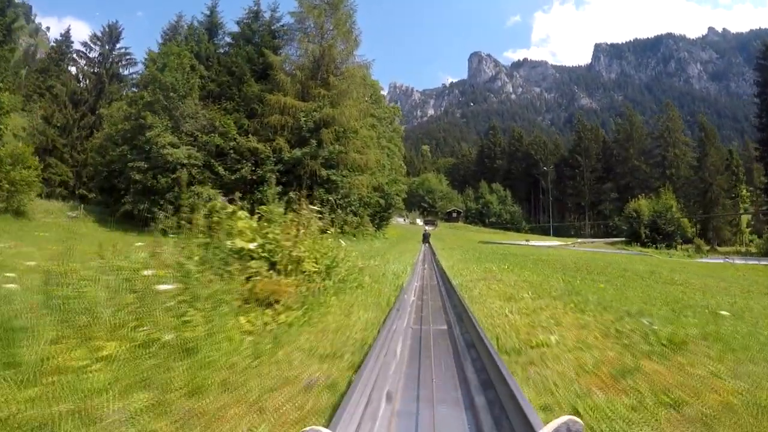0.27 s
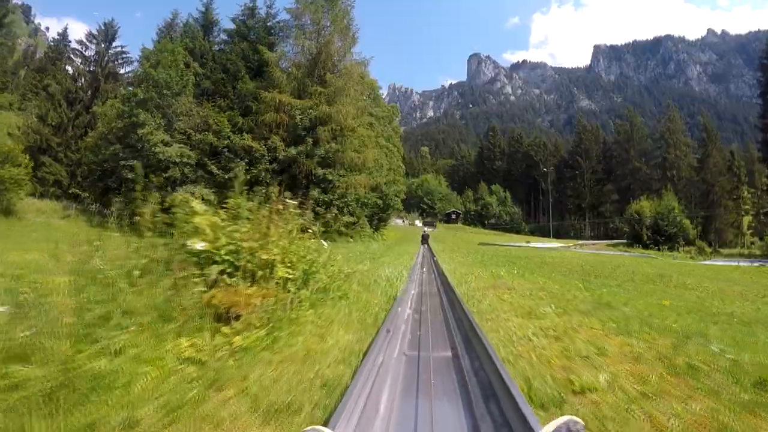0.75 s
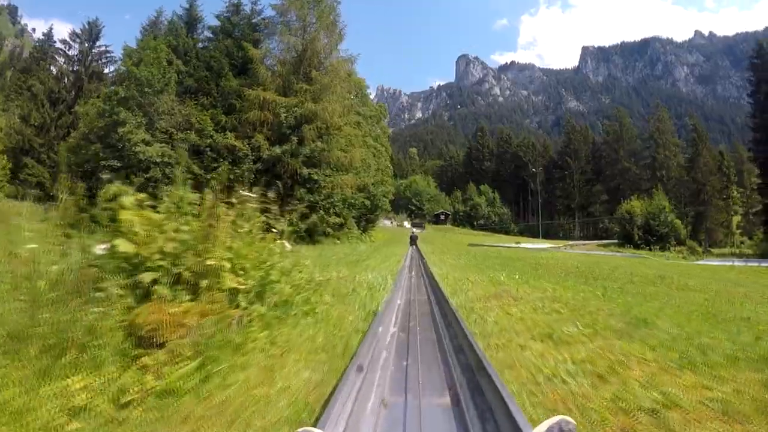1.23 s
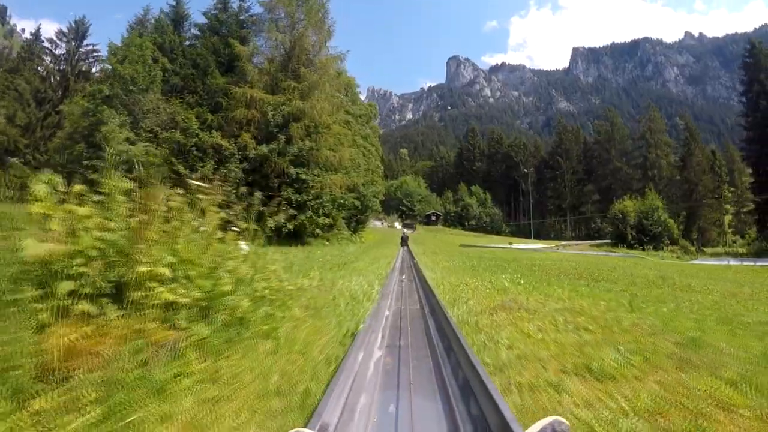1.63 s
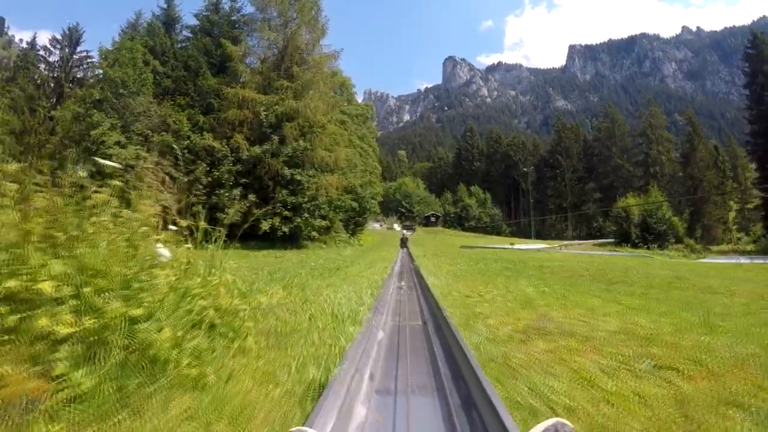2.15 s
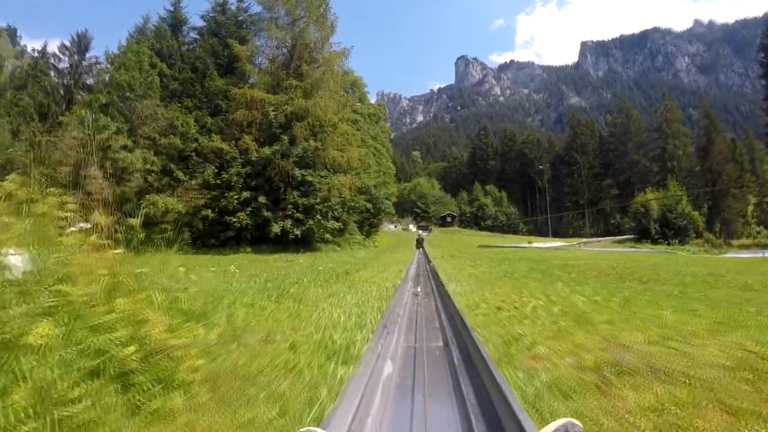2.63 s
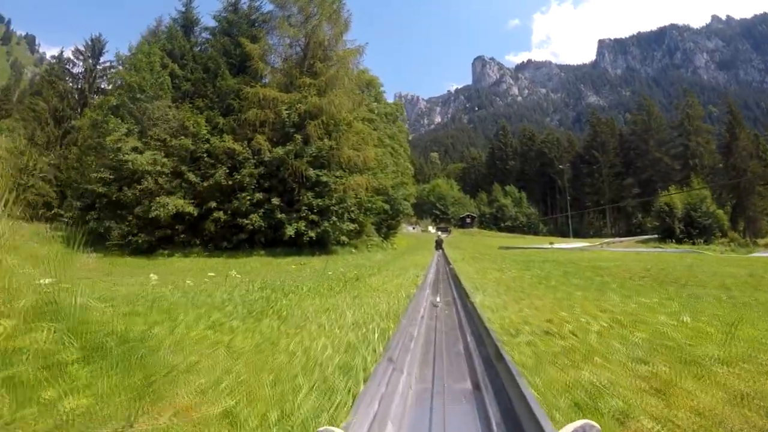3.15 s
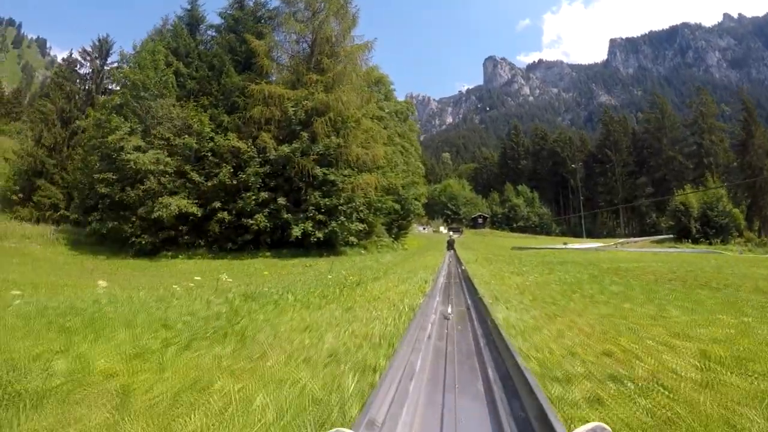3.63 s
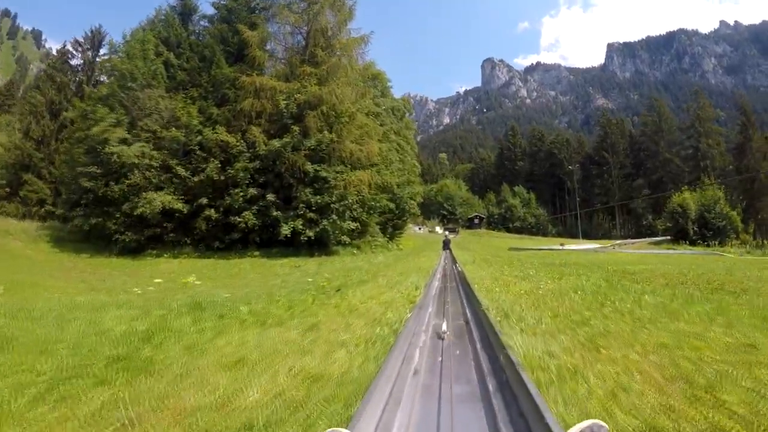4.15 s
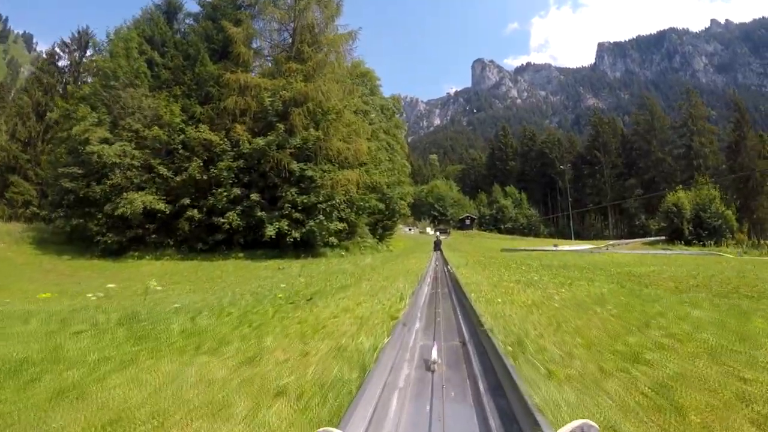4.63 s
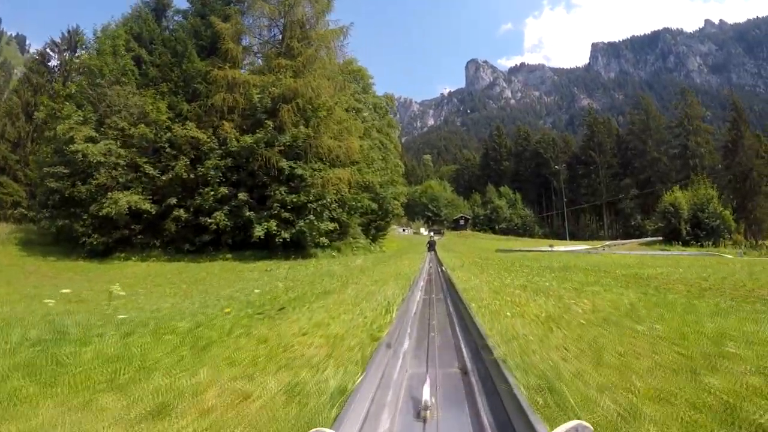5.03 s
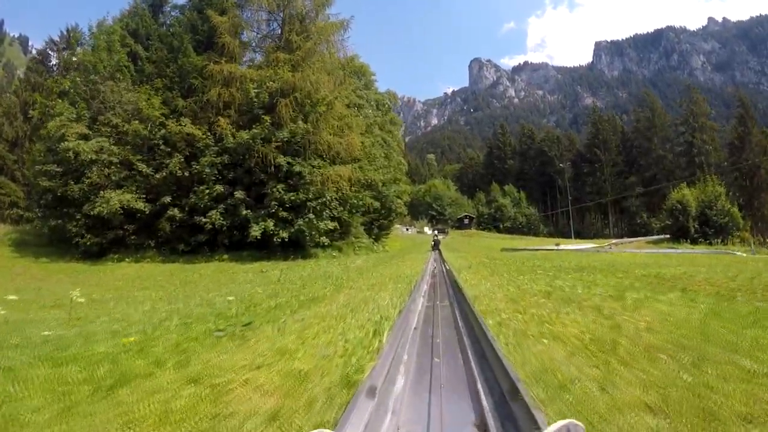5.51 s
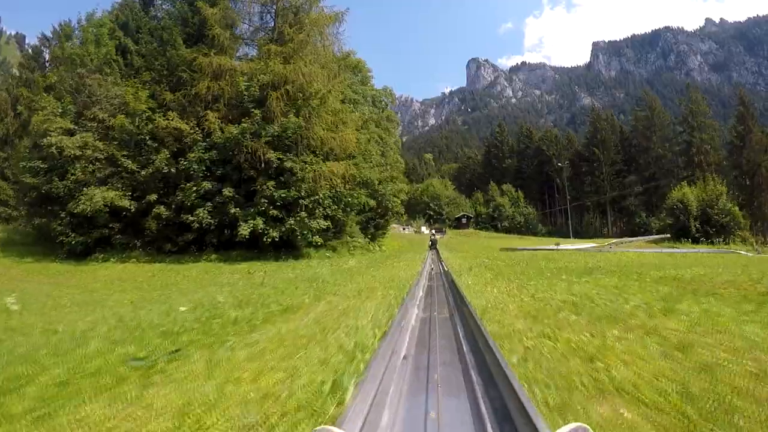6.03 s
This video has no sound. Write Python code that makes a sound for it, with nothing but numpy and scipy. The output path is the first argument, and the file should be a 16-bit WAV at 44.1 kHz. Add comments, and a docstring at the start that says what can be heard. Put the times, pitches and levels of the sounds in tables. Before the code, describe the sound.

A summer toboggan rolls down a metal trough, heard from the sled. Throughout the six seconds or so, the chassis rumbles low, the trough drones and the wheels growl with a light hiss and ticks of grit. Heavy rattling jolts come right at the start, around 0.4 to 0.7 seconds and at 1.4 seconds, with lighter knocks of loose parts between and after. A faint, high cricket buzz rises from about 0.2 seconds and stops abruptly at 1.2. From 2.4 seconds the runners give occasional tiny, faint squeaks. The sound starts in mono and opens into very wide stereo between 3.5 and 4 seconds, followed by a cluster of short pitched clicks. The rolling then eases a little. Soft hollow wheel taps come from 4.6 seconds to the end, and at 5.8 seconds the wheels strike a joint with a short metallic clack.

```python
"""Summer toboggan in a metal trough.

Heard from the sled: the rough track shakes the chassis and drums on the trough; the wheels growl,
roar and hiss. Loose parts knock amid pitched clicks, grit ticks, the runners catch and squeak. Early
on a bush cricket buzzes in the meadow, file on scraper; late, the wheels tap and strike a joint.
Mono at first, opening into very wide stereo after 3.5 s."""
import sys
import numpy as np
from scipy import signal
from scipy.fft import rfft, irfft
from scipy.io import wavfile
from scipy.ndimage import uniform_filter1d

SR = 44100
rng = np.random.default_rng(int(sys.argv[2]) if len(sys.argv) > 2 else 0)


def transcribe(u):
    """Save the signal u as a 16-bit wav file named by the first command-line argument.

    u: samples, shape (n,) or (channels, n), limited to [-1, 1]; the rate is SR.
    q: integer samples, one column per channel.
    """
    v = np.clip(np.atleast_2d(u).T, -1, 1)
    q = np.round(v * 32767).astype(np.int16)
    wavfile.write(sys.argv[1], SR, q)


N = 276507
TIME_S, HZ = np.arange(N) / SR, np.fft.rfftfreq(N, 1 / SR)
BLOW_S, BLOW_HZ = np.arange(8192) / SR, np.fft.rfftfreq(8192, 1 / SR)

# Shaking of the sled. Each row: time in seconds, chassis rumble in dB, trough drone in dB.
SHAKE = [(0.0, -6.5, -21.5), (0.05, -20, -20.5), (0.14, -3.5, -23.5), (0.21, -20.5, -26.5),
         (0.71, -18.5, -17.5), (0.77, -21.5, -25), (1.33, -14.5, -22.5), (1.4, -30, -20),
         (1.55, -14, -23.5), (1.82, -22, -28.5), (1.9, -13, -22.5), (2.0, -16.5, -16.5), (2.2, -16.5, -18),
         (2.4, -13.5, -21.5), (2.66, -20, -17.5), (2.88, -17, -21.5), (3.2, -17.5, -21), (3.33, -15, -18.5),
         (3.7, -18.5, -22.5), (3.75, -27.5, -24.5), (5.71, -23.5, -29), (6.22, -24.5, -25),
         (6.27, -21.5, -35.5)]
# Rolling contact. Each row: time in seconds, track roughness in dB, hiss in dB.
ROLL = [(0.0, -33.5, -49.5), (0.19, -44, -57.5), (0.44, -43.5, -57.5), (0.56, -36, -55), (0.91, -44, -58.5),
        (1.48, -40.5, -54.5), (1.8, -42, -58), (2.16, -39, -53.5), (2.47, -44, -56), (2.58, -40.5, -54),
        (2.79, -41, -53.5), (4.12, -40.5, -58), (4.4, -46.5, -60.5), (5.9, -50, -63.5),
        (6.27, -47.5, -64.5)]


def gain_of(db):
    """Decibels to amplitude."""
    return 10 ** (np.asarray(db) / 20)


def unit_rms(x):
    """Scale to rms 1."""
    return x / np.sqrt(np.mean(x ** 2) + 1e-20)


def curves(rows):
    """Each later column, interpolated over the times in the first."""
    times_s, *columns = np.transpose(rows)
    return [np.interp(TIME_S, times_s, column) for column in columns]


def spectrum(points, hz=HZ):
    """Gain through (Hz, dB) points on a log-frequency axis; steep fall past the last."""
    point_hz, point_db = np.transpose(points)
    db = np.interp(np.log(hz + 1), np.log(point_hz + 1), point_db)
    return gain_of(db) / np.maximum(hz / point_hz[-1], 1) ** 5


def ringing(modes, hz=HZ):
    """Gain of resonances given as (centre Hz, width Hz, dB)."""
    return np.sqrt(sum(gain_of(db) ** 2 / (1 + (2 * (hz - f) / width) ** 2) for f, width, db in modes))


def colour(x, gain):
    """Filter a whole signal, then scale to rms 1."""
    return unit_rms(irfft(rfft(x) * gain, N))


def noise(n=N):
    """White noise."""
    return rng.standard_normal(n)


def wander(rate_hz):
    """Slow random curve, rms 1."""
    return colour(noise(), np.exp(-(HZ / rate_hz) ** 2))


def causal(gain):
    """Minimum-phase impulse response: sharp start, then ringing."""
    cepstrum = irfft(np.log(np.maximum(gain, 1e-5)))
    half = len(cepstrum) // 2
    cepstrum[1:half] *= 2
    cepstrum[half + 1:] = 0
    return irfft(np.exp(rfft(cepstrum)))


def resonate(x, hz, width_hz):
    """Resonator that follows the curve hz."""
    turn = np.exp(2j * np.pi * np.cumsum(hz) / SR)
    pole = np.exp(-np.pi * width_hz / SR)
    return 2 * (turn * signal.lfilter([1 - pole], [1, -pole], x / turn + 1e-18)).real


def add(mix, start_s, sound):
    """Mix a sound in at start_s."""
    part = mix[max(round(start_s * SR), 0):][:len(sound)]
    part += sound[:len(part)]


def steadied(x, span_s):
    """Hold the running rms near 1."""
    return x / np.sqrt(uniform_filter1d(x ** 2, int(span_s * SR)) + 1e-6)


def patchy(x, depth_db):
    """Narrow bands flare and fade briefly, each on its own."""
    bands = signal.stft(x, nperseg=512)[2]
    patches = uniform_filter1d(noise(bands.shape), size=5, axis=0)
    patches = unit_rms(uniform_filter1d(patches, size=3, axis=1))
    return unit_rms(signal.istft(bands * gain_of(depth_db * patches), nperseg=512)[1][:N])


def frame_gain(hz, ring):
    """The sled frame's resonances on top of a flat response."""
    # Each row: centre in Hz, width in Hz, gain in dB.
    frame_modes = [(1430, 120, -13.5), (1850, 19, -0.5), (2077, 140, -4.5), (2080, 22, -6), (2420, 25, -2),
                   (2710, 27, 6), (3260, 45, 1), (3720, 240, 0.5), (4860, 26, 5.5), (5300, 45, -12)]
    return 1 + ring * ringing(frame_modes, hz)


def chassis_rumble(opening):
    """The rough track shakes the chassis."""
    # Each row: frequency in Hz, gain in dB.
    rumble_spectrum = [(6, 5.5), (13, -0.5), (20, 1.5), (31, 7.5), (45, 4.5), (62, 8), (75, 0.5),
                       (92, -5.5), (130, -37.5), (260, -51)]
    level_db = curves(SHAKE)[0] + 4.5 * opening
    return gain_of(level_db) * steadied(colour(noise(), spectrum(rumble_spectrum)), span_s=0.27)


def trough_drone(opening):
    """The wheels drum on the trough; its resonances slide as they move along each sheet."""
    # Each row: centre in Hz, width in Hz, gain in dB.
    trough_modes = [(138.5, 36, -10.5), (178, 5.2, -1), (200.9, 12.1, -1.5)]
    trough = ringing(trough_modes) / (1 + (HZ / 250) ** 8) / (1 + (90 / (HZ + 1)) ** 4)
    surge_db = 1.5 * wander(rate_hz=15)
    pitch_ratio = 1 + 0.044 * wander(rate_hz=6.95)
    hum = np.interp(np.cumsum(pitch_ratio) % N, np.arange(N), colour(noise(), trough))
    level_db = curves(SHAKE)[1] + 0.5 + 5 * opening + surge_db
    return gain_of(level_db) * steadied(hum, span_s=0.13)


def grit(rate_per_s, spread_db):
    """Specks and dents under the wheels: sparse impulses of uneven size."""
    size = gain_of(spread_db * np.minimum(rng.exponential(1, N), 4))
    return unit_rms(size * np.sign(noise()) * (rng.random(N) < rate_per_s / SR))


def wheel_noise(bumps, opening):
    """The same rough contact excites a low growl, a mid roar and a high hiss."""
    # Spectra. Each row: frequency in Hz, gain in dB.
    growl_spectrum = [(150, -2.5), (260, 1.5), (340, 3.5), (450, -5), (600, -7.5), (740, -29), (1000, -28)]
    roar_spectrum = [(400, -16.5), (750, 13.5), (1050, 1.5), (1450, 4.5), (1700, -0.5), (2100, -1.5),
                     (2600, -13.5), (3500, -19.5)]
    hiss_spectrum = [(1200, -20), (2600, -4), (3600, 0), (5000, -1), (6500, -4), (8000, -9), (10400, -11),
                     (11500, -16), (13500, -17), (14800, -31)]
    rough_db, hiss_db = curves(ROLL)
    specks = grit(rate_per_s=110, spread_db=3.5)
    contact = unit_rms(noise() + 0.55 * specks)
    growl = colour(contact, spectrum(growl_spectrum))
    roar = colour(contact, spectrum(roar_spectrum) * frame_gain(HZ, ring=1.0))
    scrape = unit_rms(contact + 1.7 * noise())
    flutter_db = 1.2 * bumps + 1.1 * wander(rate_hz=35)
    hiss = patchy(colour(scrape, spectrum(hiss_spectrum) * frame_gain(HZ, ring=0.41)), depth_db=3)
    return (gain_of(rough_db + 8.5 + 1.3 * bumps) * growl
            + gain_of(rough_db - 5 + 2.8 * bumps) * roar
            + gain_of(hiss_db + 3 * opening + flutter_db) * hiss)


def rolling(bumps, opening):
    """Chassis, trough and wheels; rumble, drone and hiss get a boost as the stereo opens."""
    return chassis_rumble(opening) + trough_drone(opening) + wheel_noise(bumps, opening)


def blows(rows, body, lead_in_db, crack_gain, crack_s, ring):
    """A short swell of noise leads into each blow: dense crack, dying chatter, body and pitched ring."""
    lead_s = 0.04
    out, t = np.zeros(N), BLOW_S - lead_s
    lows = 1 / (1 + (BLOW_HZ / 900) ** 6)
    mids = (BLOW_HZ > 900) & (BLOW_HZ < 4000)
    highs = 1 - 1 / (1 + (BLOW_HZ / 3800) ** 4)
    crack = crack_gain * np.clip(2 * t / crack_s, 0, 1) * np.exp(-(t / crack_s) ** 2)
    for hit_s, strength_db, thud_db, bright_db, t60_s, ring_hz in rows:
        envelope_db = np.where(t < 0, lead_in_db + 110 * t / t60_s, -60 * t / t60_s)
        clumps = gain_of(2.8 * unit_rms(uniform_filter1d(noise(len(t)), size=90)))  # a few ms apart
        chatter = noise(len(t)) * (clumps * gain_of(envelope_db) + crack)
        peak = 1 + ring * ringing([(ring_hz, 0.13 * ring_hz, 0)], BLOW_HZ)
        response = body * peak * gain_of(thud_db * lows + bright_db * highs)
        blow = signal.fftconvolve(chatter, causal(response))[:len(t)]
        # Strength is mid-band energy, as if spread over 10 ms.
        mid_rms = np.sqrt(np.sum(irfft(rfft(blow) * mids) ** 2) / (SR / 100))
        add(out, hit_s - lead_s, gain_of(strength_db) * blow / mid_rms)
    return out


def clatter():
    """Heavy jolts with rebounds, and lighter knocks of loose parts, ring the frame and shell."""
    # Each row: time in seconds, strength, thud, brightness and relative rebound in dB, ring in Hz.
    jolts = [(0.04, -24, 0, -3.5, -5, 2020), (0.44, -23.5, -0.5, -5, -10, 2100),
             (0.598, -25.5, 1.5, 1, -6, 2020), (0.659, -23.5, -1, -1.5, -9.5, 2050),
             (1.429, -22.5, 3.5, 0.5, -5.5, 2020)]
    # Each row: time in seconds, strength, thud and brightness in dB, t60 in seconds, ring in Hz.
    knocks = [(0.149, -46.5, 13.5, -15, 0.057, 496), (0.417, -33, -8, 0.5, 0.033, 2080),
              (0.546, -34.5, 0.5, -9, 0.14, 1900), (1.014, -41.5, -2, 2, 0.055, 2120),
              (1.053, -38.5, 1.5, -10, .056, 780), (1.148, -33.5, 4.5, 5.5, 0.022, 2150),
              (1.246, -30.5, 2.5, -5, 0.074, 1830), (1.297, -29, 2.5, -3, 0.097, 2060),
              (1.357, -28, -0.5, -7, 0.11, 2070), (1.554, -27.5, -0.5, -2, 0.13, 1970),
              (1.761, -30.5, -2.5, -7, 0.069, 940), (2.615, -36, 6.5, -1, 0.16, 1390),
              (2.835, -34, -1.5, -2.5, 0.066, 830), (3.169, -41, 7, -8, 0.05, 1400),
              (3.356, -42, 2, -7, 0.03, 846), (3.387, -36.5, 1.5, 1.5, 0.081, 1940),
              (3.478, -37.5, -4, -5, 0.16, 3580), (3.738, -39.5, -2, -1, 0.045, 1330),
              (3.751, -35.5, 2, -4.5, 0.17, 1380), (3.884, -29.5, 2.5, -5, 0.12, 1340),
              (3.98, -39, 8, 6, 0.056, 2000), (4.088, -34, 2, 1, 0.094, 1380),
              (4.295, -38, 2, -2, 0.12, 1380), (4.498, -41, 5, -21, 0.099, 1440),
              (4.694, -43, 0.5, -3.5, 0.37, 705), (4.919, -42, 3.5, -25, 0.03, 1790),
              (5.132, -39, -2, -20, 0.15, 1460), (5.176, -45, 4, 7, 0.17, 1420),
              (5.498, -36, 3.5, 1, 0.12, 1390), (6.211, -42.5, 3, -1, 0.11, 1780)]
    # Each row: frequency in Hz, gain in dB.
    knock_spectrum = [(20, -17.5), (70, -3.5), (190, 22.5), (350, 15), (520, 14), (780, 12), (1050, 1.5),
                      (1500, 1), (2150, -2), (2600, -10), (3700, -7.5), (5500, -10), (7500, -16),
                      (10000, -21.5), (12000, -34.5), (14500, -32.5)]
    # Each row: centre in Hz, width in Hz, gain in dB.
    shell_modes = [(222, 42, -2.5), (326, 39, 4), (366, 27, -3.5), (740, 71, -10)]
    jolt_t60_s, rebound_t60_s, rebound_delay_s, rebound_thud_db = 0.088, 0.16, 0.015, -1
    rows = list(knocks)
    for hit_s, strength_db, thud_db, bright_db, rebound_db, ring_hz in jolts:
        rows.append((hit_s, strength_db, thud_db, bright_db, jolt_t60_s, ring_hz))
        rows.append((hit_s + rebound_delay_s, strength_db + rebound_db, rebound_thud_db,
                     bright_db + 7.5, rebound_t60_s, ring_hz))
    shell = 1 + ringing(shell_modes, BLOW_HZ)
    body = spectrum(knock_spectrum, BLOW_HZ) * frame_gain(BLOW_HZ, ring=1.6) * shell
    return blows(rows, body, lead_in_db=-5.5, crack_gain=1.03, crack_s=0.0086, ring=1.8)


def clicks():
    """Short pitched clicks, most later ones ringing near 1400 Hz, among faint random ticks of grit."""
    # Each row: time in seconds, strength, thud and brightness in dB, t60 in seconds, ring in Hz.
    pitched_clicks = [(1.64, -33, -15, -1.5, 0.027, 2200), (1.717, -34.5, -13, 2, 0.03, 1630),
                      (2.187, -33, 5, 3.5, .035, 442), (2.523, -30, 4.5, 5.5, 0.064, 2080),
                      (2.663, -39.5, 8, -27, .025, 1400), (3.063, -34, 6, -3, .028, 3560),
                      (3.244, -41.5, -6, -1, 0.033, 2100), (4.029, -35, 11, -7.5, 0.025, 1320),
                      (4.101, -28, 12, -0.5, 0.031, 1410), (4.119, -38.5, 8.5, -9, 0.012, 1400),
                      (4.159, -41.5, 5, -8, .013, 1400), (4.21, -32, 6, -8, .03, 1320),
                      (4.246, -30.5, 8.5, 0, 0.019, 1410), (4.438, -37.5, 4.5, 2, 0.012, 1390),
                      (4.515, -41.5, -2, -10, 0.014, 1410), (4.662, -35.5, -1, -4, 0.016, 1700),
                      (4.732, -34, 2.5, 1, 0.055, 1386), (5.422, -42.5, 9.5, -8, 0.014, 2250),
                      (5.563, -29, 7, -9, 0.018, 1480), (6.147, -46.5, 10, 0, 0.015, 1830),
                      (6.168, -37.5, 4, -24, 0.061, 1440)]
    # Each row: frequency in Hz, gain in dB.
    click_spectrum = [(60, -2.5), (200, 7.5), (500, 6), (800, 0.5), (1400, 1), (2000, -2.5), (3500, -8.5),
                      (5500, -7), (7000, -23), (9000, -31.5), (14000, -43)]
    ticks_per_s, spread_db, low_hz, high_hz = 16, 8, 1120, 5000
    thud_db, bright_db, t60_s = 3.5, -5, 0.067
    rows, hiss_db = list(pitched_clicks), curves(ROLL)[1]
    for when, size, tone in rng.random((round(ticks_per_s * N / SR), 3)):
        strength_db = hiss_db[int(when * N)] - 2 + spread_db * (2 * size - 1)
        ring_hz = low_hz * (high_hz / low_hz) ** tone
        rows.append((when * N / SR, strength_db, thud_db, bright_db, t60_s, ring_hz))
    body = spectrum(click_spectrum, BLOW_HZ) * frame_gain(BLOW_HZ, ring=0.78)
    return blows(rows, body, lead_in_db=-0.5, crack_gain=2.0, crack_s=0.0026, ring=2.86)


def cricket():
    """Wing strokes drag a file over a scraper, growing slower, harder and brighter, then stop dead."""
    # Each row: time in seconds, strokes per second, pitch in Hz, relative level and upper modes in dB.
    song = [(.24, 55.8, 8100, -66, -13), (.35, 55.8, 8100, -59.5, -11), (.56, 55.5, 8150, -53.5, -8),
            (.8, 54.6, 8150, -52.5, -5.5), (.98, 52.4, 8120, -50.5, -4.5), (1.12, 50, 8250, -47.5, -3.5),
            (1.222, 48.5, 8450, -47.5, -4)]
    # Each row: multiple of the pitch, width in Hz, level in dB.
    wing_modes = [(1, 613, -3.5), (1.12, 1100, -10), (1.18, 900, -2.5), (1.55, 2400, -17)]
    strokes_per_s, pitch_hz, level_db, upper_db = curves(song)
    singing = (TIME_S > song[0][0]) * (TIME_S < song[-1][0])
    phase = np.cumsum(strokes_per_s * singing) / SR % 1
    stroke = 0.17 + np.exp(-((phase - 0.5) / 0.2) ** 2)  # the wing never quite rests
    uneven_db = 1.2 * wander(rate_hz=60)
    rasp = noise() * stroke * gain_of(uneven_db) * singing
    modes = []
    for i, (ratio, width_hz, mode_db) in enumerate(wing_modes):
        mode_hz = ratio * pitch_hz
        mode = resonate(resonate(rasp, mode_hz, width_hz), mode_hz, width_hz)
        modes.append((-1) ** i * gain_of(mode_db) * unit_rms(mode))  # neighbours swing opposite ways
    return gain_of(level_db - 9.5) * unit_rms(modes[0] + gain_of(upper_db) * sum(modes[1:]))


def squeaks():
    """The runners catch: a puff of friction in one narrow resonance, with a little broad scrape."""
    # Each row: centre time in seconds, level in dB, pitch in Hz, length in seconds.
    catches = [(2.4, -50, 5460, 0.018), (2.415, -57, 6870, 0.017), (2.59, -44, 2700, .012),
               (2.705, -48.5, 2720, 0.016), (2.708, -57, 6000, 0.011), (2.792, -52.5, 9000, 0.01),
               (2.972, -51.5, 6700, .02), (3.143, -48, 2730, .01), (3.21, -58, 3870, .01),
               (3.46, -53, 7800, 0.014), (3.818, -49, 6340, 0.04), (4.327, -51.5, 6640, 0.019),
               (5.428, -56, 6624, 0.015), (6.115, -55.5, 6300, 0.013)]
    # Each row: frequency in Hz, gain in dB.
    scrape_spectrum = [(1000, -23), (2500, 10), (10000, -7), (13500, -16)]
    scrape = gain_of(-10) * spectrum(scrape_spectrum, BLOW_HZ)
    out, t = np.zeros(N), BLOW_S - 0.06
    for centre_s, level_db, pitch_hz, length_s in catches:
        rub = noise(len(t)) * np.exp(-(2 * t / length_s) ** 2)
        tone = ringing([(pitch_hz, 0.071 * pitch_hz, 0)], BLOW_HZ) ** 2
        squeak = unit_rms(irfft(rfft(rub) * (tone + scrape))) * np.sqrt(length_s * SR / len(t))
        add(out, centre_s + t[0], gain_of(level_db) * squeak)
    return out


def wheel_taps():
    """Soft, scuffing blows ring a hollow, well damped resonance, slightly retuned each time."""
    # Each row: start in seconds, relative strength in dB.
    taps = [(4.595, -26), (4.688, -21), (4.798, -20.5), (4.92, -20), (5.128, -21), (5.15, -22), (5.39, -25),
            (5.62, -15), (5.692, -21), (5.728, -21), (5.931, -22), (5.972, -19), (5.999, -18.5),
            (6.029, -18.5), (6.207, -18.5)]
    # Each row: centre in Hz, width in Hz, gain in dB.
    hollow_modes = [(675, 44, 4), (1400, 310, -34), (1900, 160, -26)]
    out, t = np.zeros(N), np.arange(4096) / SR
    for start_s, strength_db in taps:
        scuff = noise(len(t)) * t * np.exp(-t / 0.003)
        hz = BLOW_HZ * rng.uniform(0.95, 1.05)
        hollow = ringing(hollow_modes, hz) / (1 + (hz / 2400) ** 4) / (1 + (400 / (hz + 1)) ** 4)
        tap = unit_rms(signal.fftconvolve(scuff, causal(hollow))[:len(t)])
        add(out, start_s, gain_of(strength_db - 26.5) * tap)
    return out


def trough_joint():
    """The wheels strike a joint, hard and sudden, and ring the metal."""
    # Each row: time in seconds, strength, thud and brightness in dB, t60 in seconds, ring in Hz.
    strikes = [(5.787, -27.5, -2.5, 2, 0.02, 1870), (5.793, -30.5, 8, -4, 0.059, 1390),
               (5.8, -29.5, 1.5, 8, 0.15, 3120), (5.819, -42.5, 3, -2, 0.076, 2750)]
    # Each row: centre in Hz, width in Hz, gain in dB.
    metal_modes = [(470, 200, 8), (767, 34, 5), (1280, 120, 2), (1460, 60, -10), (1890, 180, -2),
                   (2730, 45, -7), (2970, 100, -12), (3230, 58, -12.5), (4870, 150, -14), (5860, 140, -15),
                   (8000, 600, -32)]
    metal = ringing(metal_modes, BLOW_HZ) / (1 + (BLOW_HZ / 9500) ** 10)
    return blows(strikes, metal, lead_in_db=-28, crack_gain=1.6, crack_s=0.0032, ring=2.1)


def scene():
    """Mono at first; then the mid thins, the side takes over the bass and the sound leans right."""
    # Each row: time in seconds, stereo opening as a share of 1.
    stereo_width = [(3.43, 0), (3.6, 0.06), (3.8, 0.25), (4.05, 0.39)]
    # Stereo responses. Each row: frequency in Hz, gain in dB.
    mid_spectrum = [(20, 2), (60, -4.5), (120, 1), (200, -8), (290, -23), (400, -12), (560, -8), (700, 9),
                    (860, -35), (1150, -23), (1450, -0.5), (1650, -13.5), (1880, -1.5), (2350, -25),
                    (2850, -0.5), (4200, -38), (6000, -4), (10000, 3), (14000, -26)]
    side_spectrum = [(20, 11.5), (60, 16), (200, 16.5), (280, 3), (390, 23), (500, 12), (580, 26),
                     (720, 13), (880, 17.5), (1050, 11), (1270, 10), (1450, 4), (2000, 4.5), (2700, 2.5),
                     (4200, -4.5), (6500, 10), (9000, 7), (15000, -8.5)]
    bumps, opening = wander(rate_hz=23.6), curves(stereo_width)[0]
    sled = rolling(bumps, opening) + clatter() + clicks()
    # Fresh noise for the side signal, each source at its own level.
    side_sled = rolling(bumps, opening) + gain_of(-1) * clatter() + gain_of(3.5) * clicks()
    thinned = irfft(rfft(sled) * spectrum(mid_spectrum), N)
    mid = (1 - opening) * sled + opening * thinned
    mid += trough_joint() + wheel_taps() + squeaks() + cricket()
    wide = irfft(rfft(side_sled + gain_of(1.5) * trough_joint()) * spectrum(side_spectrum), N)
    wide += gain_of(15) * wheel_taps()
    lean_share, lean_gain = 0.5, gain_of(0.3 * opening)
    side = opening * (wide - lean_share * mid)
    return np.array([(mid + side) / lean_gain, (mid - side) * lean_gain])


def record(dry):
    """Round off the highest peaks, then low-pass."""
    ceiling, cutoff_hz = 0.92, 15300
    rounded = dry / (1 + abs(dry / ceiling) ** 6) ** (1 / 6)
    lowpass = signal.firwin(511, cutoff_hz, window=("kaiser", 9), fs=SR)
    return signal.oaconvolve(rounded, lowpass[None], "same")


dry = scene()
out = record(dry)
transcribe(out)
```